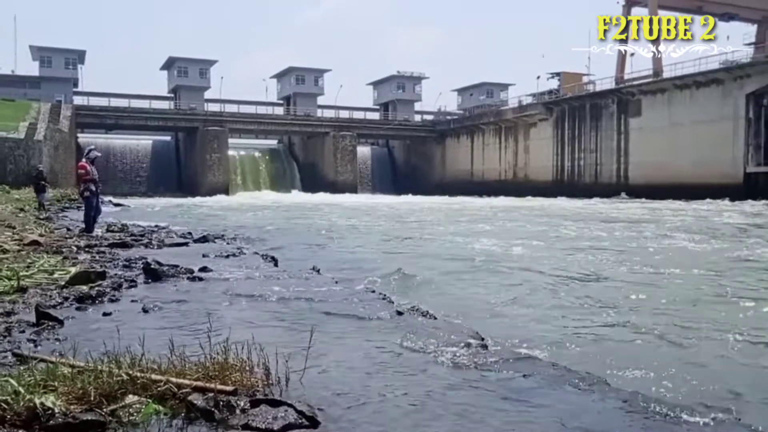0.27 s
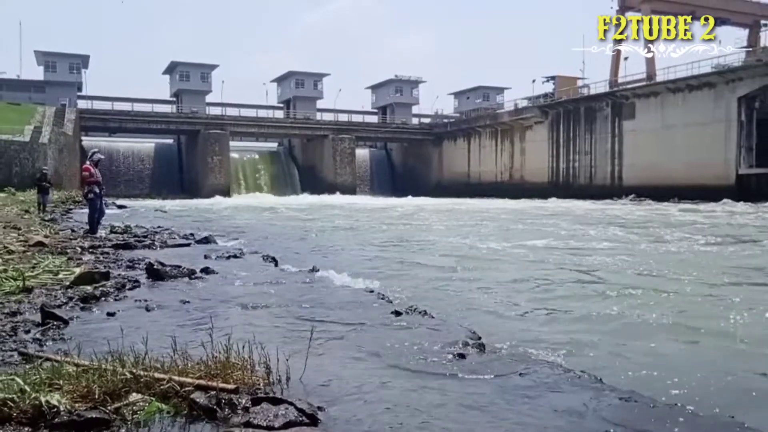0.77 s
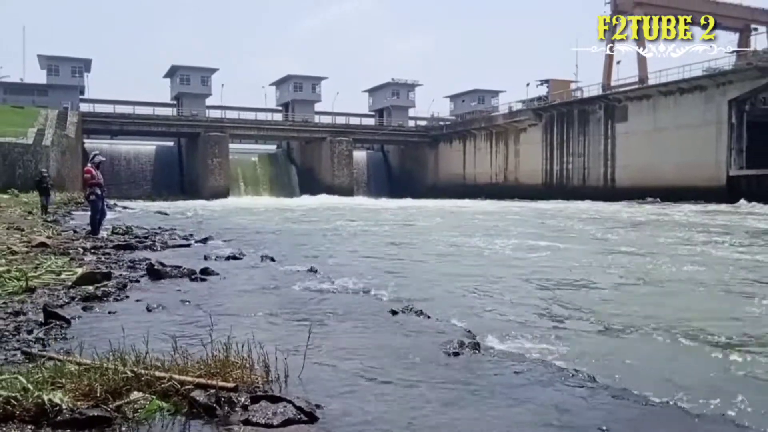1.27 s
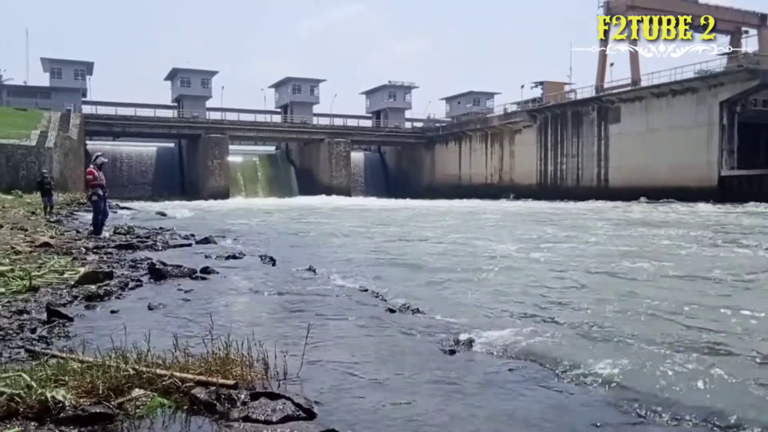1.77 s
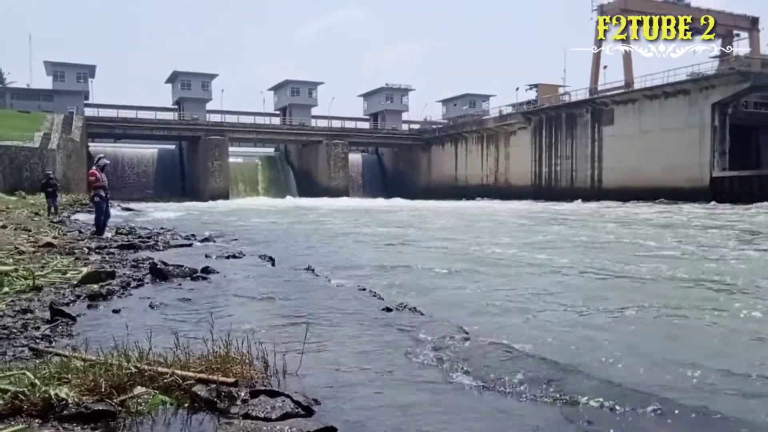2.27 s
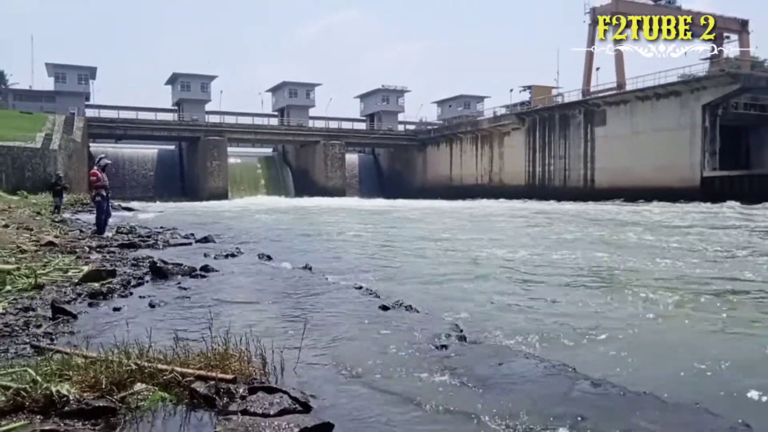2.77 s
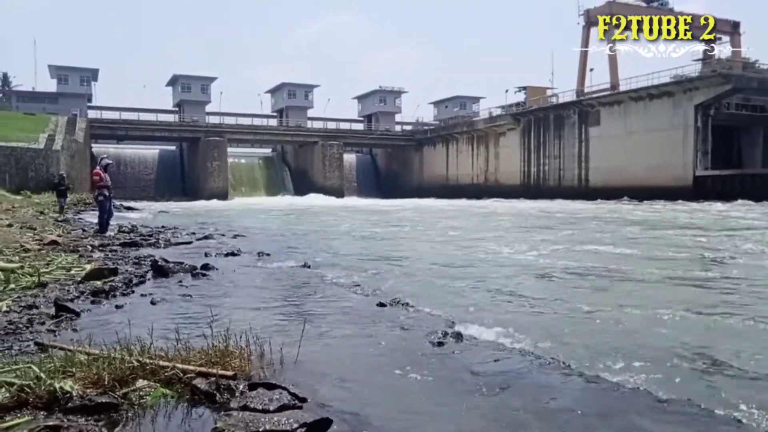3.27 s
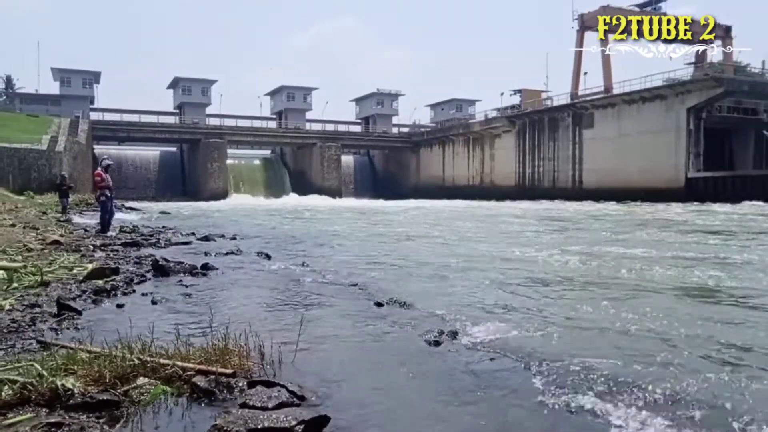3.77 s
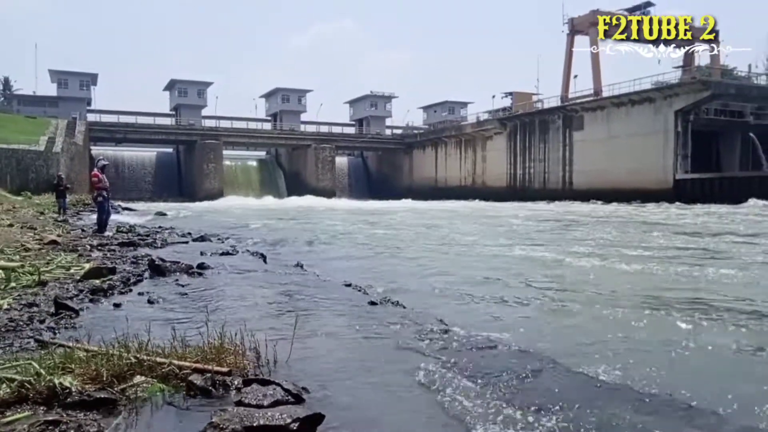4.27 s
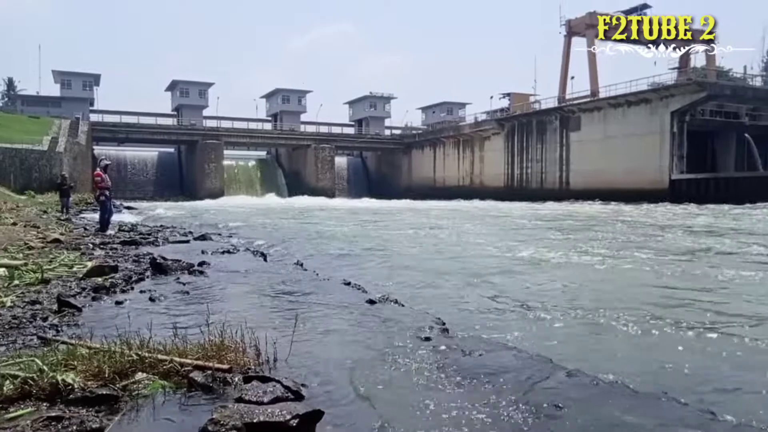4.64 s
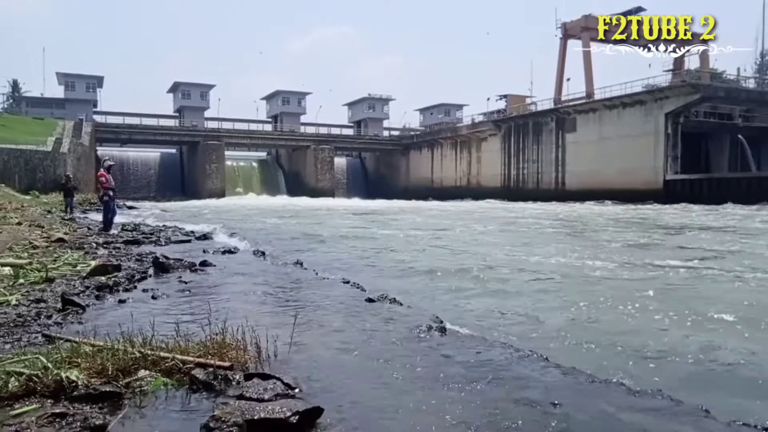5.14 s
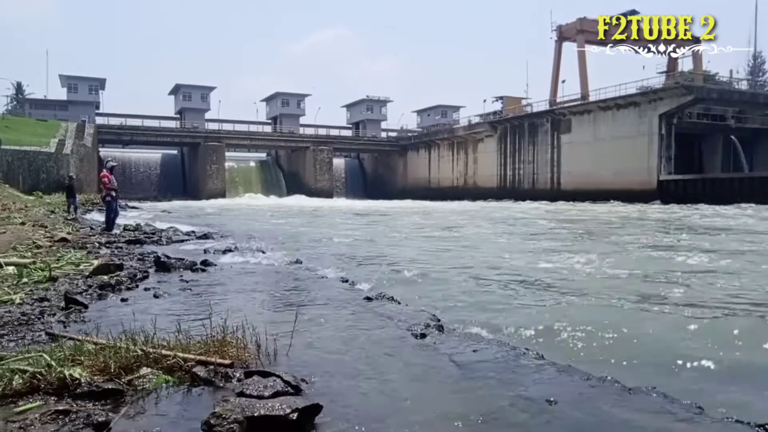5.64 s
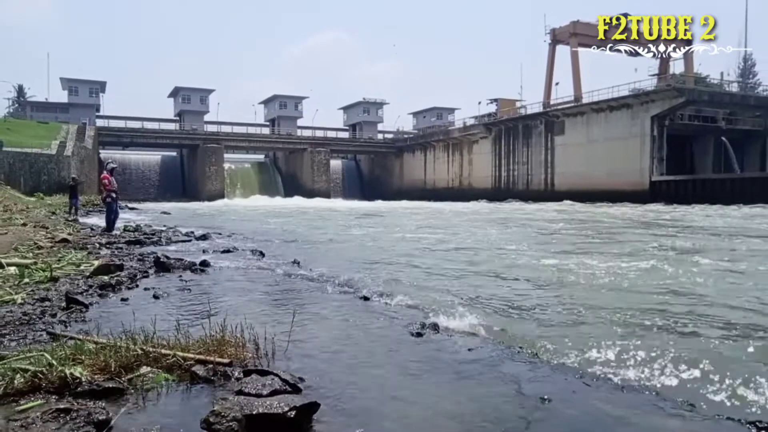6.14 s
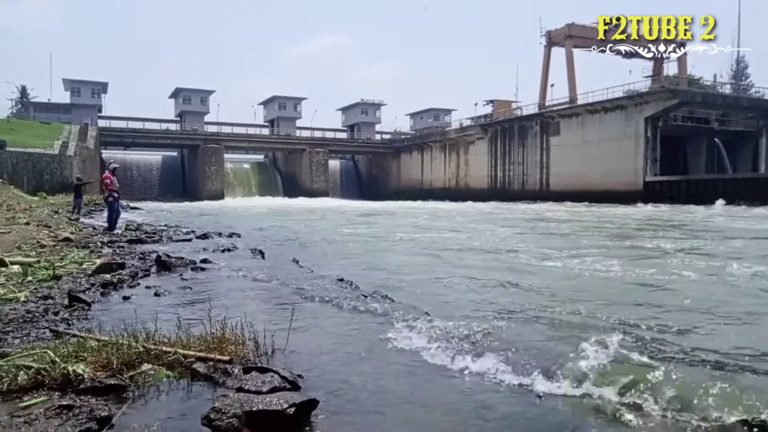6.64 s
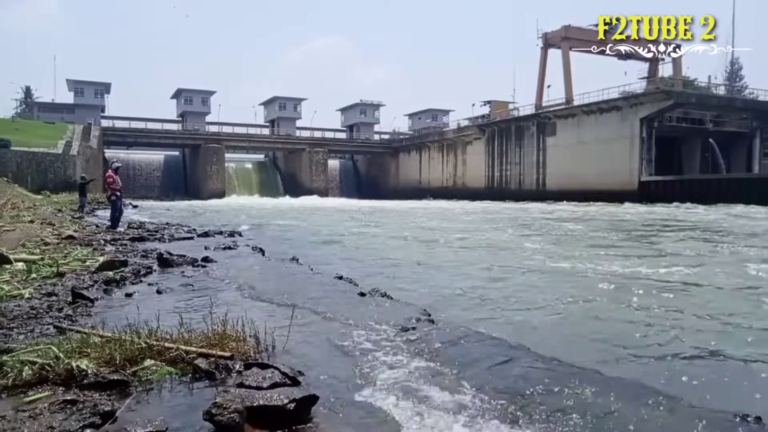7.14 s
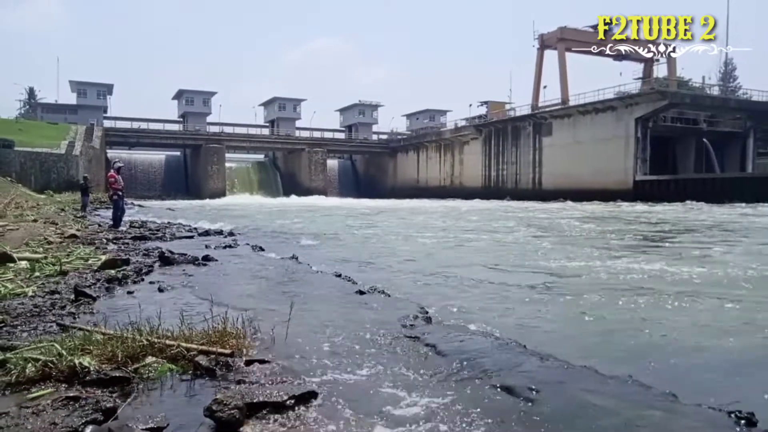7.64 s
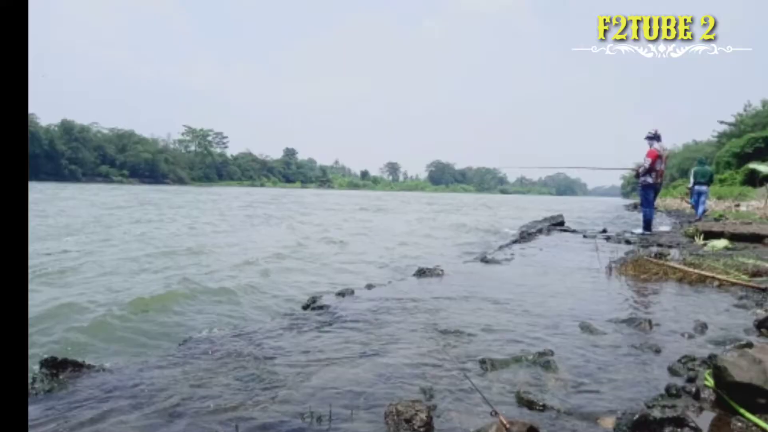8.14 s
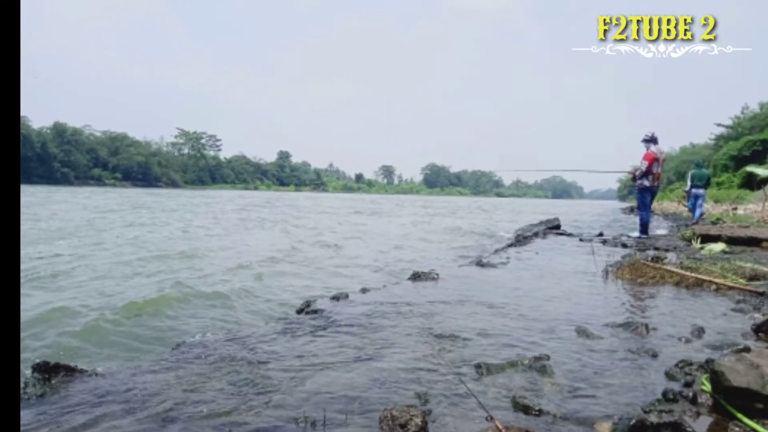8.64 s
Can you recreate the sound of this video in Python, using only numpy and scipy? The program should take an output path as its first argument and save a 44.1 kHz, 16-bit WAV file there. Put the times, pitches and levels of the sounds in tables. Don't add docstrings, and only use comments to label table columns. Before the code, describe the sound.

Outdoors on a rocky riverbank, a distant weir roars low and steady throughout. Close to the microphone, small waves lap and gurgle over stones, swelling into sharp slaps, plops and spitting spray near three and a half seconds and again around seven. Calmer bubbling lies between; the sound stops abruptly at eight seconds.

```python
import sys
import numpy as np
from scipy import signal
from scipy.fft import rfft, irfft, next_fast_len
from scipy.io import wavfile
from scipy.ndimage import uniform_filter1d

SR = 44100
rng = np.random.default_rng(int(sys.argv[2]) if len(sys.argv) > 2 else 0)


def wav_out(sig):
    wavfile.write(sys.argv[1], SR, np.round(np.clip(np.atleast_2d(sig).T, -1, 1) * 32767).astype(np.int16))


def gain_from_db(level_db):
    decades = np.asarray(level_db, float) / 20
    return 10 ** decades


N = 392913
CUT_S, CALM_DB = 8.0147, -39.5

# time in seconds, force in dB, depth (extra low gurgle) in dB, spray (extra fine
# mist) in dB.
WAVES = [(0.0, -40.5, 2, -0.5), (1.3, -43, 3, 0.5), (1.62, -37.5, 9, 4.5), (2.05, -41, 6.5, 2.5),
         (2.3, -38, 4, 0.5), (3.15, -36, 5, -1), (3.5, -32.5, 5.5, 2), (3.8, -29, 5, 0.5),
         (4.25, -37, 5.5, 1.5), (4.8, -38, 1.5, -2), (5.42, -38, 7.5, -2.5), (6.1, -37, -2, -3),
         (6.28, -37, 1, 2), (6.44, -40, 6, 1), (6.6, -37, 5, 2.5), (7.03, -29.5, 3.5, 1),
         (7.45, -35.5, 3.5, 2.5), (8.0, -39.5, 6, 1)]
# lowest pitch in Hz, highest pitch in Hz, ring in cycles,
# rate in bubbles per second, size spread in dB, trim in dB.
SWARMS = [
    (296.3, 850, 5.3, 2000, 2, -6),
    (884, 2220, 5.6, 3000, 2.5, -6),
    (2190, 4600, 5.96, 5000, 3, -2.5),
    (4666, 8800, 7., 5500, 2, -2),
    (9320, 15800, 7., 8000, 0.5, -0.5),
]
# start in seconds, peak in dB, pitch of the peak in the top treble in Hz,
# mid treble against the top in dB.
SPITS = [(1.3119, -33.5, 10500, 1.5), (1.4321, -31, 9400, 9), (1.6297, -29.5, 9280, -5),
         (1.7474, -27, 12600, -0.5), (1.8088, -34, 15200, 4), (2.3306, -31, 9270, -7),
         (3.4705, -22, 14500, -1), (3.4979, -35, 11700, 5.5), (3.5768, -24, 13300, -8),
         (3.6586, -33.5, 13800, 3), (3.7219, -26, 14600, 4.5), (3.7688, -25, 13400, 3),
         (4.0297, -33, 15100, -4), (4.1435, -24.5, 11500, 0.5), (4.3151, -22, 11000, -6),
         (4.3505, -23, 14300, -3), (4.7411, -30, 12300, -2), (4.8264, -33, 9870, -4),
         (6.2567, -28, 13800, -1), (6.3435, -30, 9420, -8), (6.5076, -22.5, 13900, -6),
         (6.5475, -24, 9180, -20), (6.7555, -30, 12100, -19), (6.9012, -27.5, 10300, 0.5),
         (6.9561, -26, 13900, -6), (6.996, -27, 13200, -3), (7.199, -26.5, 9130, 3.5),
         (7.2549, -29, 14000, 5), (7.3687, -27, 15300, -11), (7.5343, -29.5, 9850, 4)]
# frequency in Hz, gain in dB.
PORT = [(2500, -0.5), (3300, 1.5), (3800, -0.5), (4300, -6.5), (5200, -8.5), (6200, -5.5), (7280, -0.5),
        (8300, -8), (9900, -17.5), (13000, -20), (14500, -25), (16000, -26.5)]


def evened(x):
    return x / np.sqrt(np.mean(x ** 2) + 1e-20)


def coloured(x, *spectra):
    size = next_fast_len(len(x))
    log_hz = np.log(np.fft.rfftfreq(size, 1 / SR) + 1)
    gain_db = 0
    for spectrum in spectra:
        hz, db = np.transpose(spectrum)
        gain_db = gain_db + np.interp(log_hz, np.log(hz), db)
    return irfft(rfft(x, size) * gain_from_db(gain_db), size)[:len(x)]


def curve(rows, index):
    rows = np.array(rows)
    return np.interp(np.arange(N) / SR, rows[:, 0], rows[:, index])


def add(mix, start_s, sound):
    part = mix[round(start_s * SR):][:len(sound)]
    part += sound[:len(part)]


def bubble(hz, cycles, glide, snap=7):
    u = np.arange(int(4 * SR * cycles / hz) + 8) * hz / SR / cycles
    envelope = (1 - np.exp(-snap * u)) * np.exp(-2.5 * u)
    return envelope * np.sin(2 * np.pi * cycles * (u + glide * u ** 2))


def waves():
    out = np.zeros(N)
    for power, (*bubbles, trim_db) in zip(stirring(), SWARMS):
        out += np.sqrt(power) * swarm(*bubbles)
    return out


def stirring():
    # level in calm water in dB, share of force,
    # share of depth, share of spray, churn in dB.
    answers = [
        (-41, 0.83, 1.22, 0, 0.44),
        (-39, 0.88, 0.79, 0, 0.87),
        (-40.5, 1, 0.066, 0.28, 0.9),
        (-46, 0.82, 0, 0.78, 1.46),
        (-57, 1, 0.18, 1.1, 2.3),
    ]
    # start in seconds, patter peak in dB, gurgle against patter in dB,
    # fizz against patter in dB.
    slaps = [(1.305, -31.5, 0, 6), (1.477, -28, 4, -12), (1.585, -22, 3, -7), (1.7464, -24, -2, -3),
             (1.885, -30, -6, 4), (3.31, -24, 4, -7), (3.47, -15, -10, -8.5), (3.5409, -20, 3, -2),
             (3.59, -13, -3, -19), (3.64, -23.5, -1, -10.5), (3.69, -15.5, -10, -4),
             (3.735, -20.5, 0.5, -4), (3.7673, -11.5, -2.5, -4.5), (3.87, -39.5, 0.5, -3),
             (4.0093, -18, -1, -14), (4.11, -25, -2, 2), (4.33, -20, 3, -2), (5.075, -23, 4, -7),
             (5.3954, -25, 4, -1), (6.2302, -20.5, -8, -11), (6.309, -25, 4, 2.5), (6.5086, -12.5, -5, -8),
             (6.565, -16, 0.5, -7), (6.725, -19.5, 2, -9), (6.9012, -15, -6, -6), (6.9386, -13, -8, -4.5),
             (6.997, -15.5, -14, -3.5), (7.055, -21.5, 0, 0), (7.2025, -15, -3, -6), (7.3684, -23, -10, 0)]
    churn_s, slap_ms = 0.025, 13
    deep_under_gurgle_db, spray_under_fizz_db = 8, 9

    force_db = curve(WAVES, index=1) - CALM_DB
    depth_db = curve(WAVES, index=2)
    spray_db = curve(WAVES, index=3)
    span = int(churn_s * SR)
    powers = []
    for (calm_db, force, depth, spray, churn_db), (*_, trim_db) in zip(answers, SWARMS):
        churn = uniform_filter1d(rng.standard_normal(N), span)
        churn = evened(uniform_filter1d(churn, span))
        wave_db = calm_db + force * force_db + depth * depth_db + spray * spray_db
        powers.append(gain_from_db(2 * (wave_db + churn_db * churn + trim_db)))

    t = np.arange(4000) / SR
    burst = t / (t + 0.00057) * np.exp(-2000 * t / slap_ms)
    for start_s, patter_db, gurgle_db, fizz_db in slaps:
        parts_db = (gurgle_db - deep_under_gurgle_db, gurgle_db, 0, fizz_db, fizz_db - spray_under_fizz_db)
        for power, part_db in zip(powers, parts_db):
            add(power, start_s, gain_from_db(2 * (patter_db + part_db - 10)) * burst)
    return powers


def swarm(low_hz, high_hz, cycles, rate, spread_db):
    # frequency in Hz, level in dB per Hz.
    splash = [(150, -41.5), (350, 6), (800, 3.5), (1630, 3), (2500, -5), (8000, -3), (12500, -5.5),
              (14500, 5)]
    draw, sort = rng.random((2, N))
    clumps = evened(uniform_filter1d(rng.standard_normal(N), size=300))
    size_db = spread_db * np.minimum(rng.exponential(1, N), 4.2) + 0.97 * clumps
    size = gain_from_db(size_db) * (draw < rate / SR)
    pitches_hz = np.geomspace(low_hz, high_hz, num=10)
    pitch_index = (sort * len(pitches_hz)).astype(int)
    out = np.zeros(N)
    for k, hz in enumerate(pitches_hz):
        grain = bubble(hz, cycles, glide=0.08)
        grain = grain * np.sqrt(hz) / np.linalg.norm(grain)
        out += signal.oaconvolve(size * (pitch_index == k), grain)[:N]
    return evened(coloured(out, splash, PORT))


def plops():
    # start in seconds, peak in dB, pitch in Hz.
    snaps = [(1.597, -14.5, 1500), (1.94, -17, 869), (3.47, -16.5, 1060), (3.54, -10, 3600),
             (3.576, -13, 845), (3.594, -19.5, 937), (3.601, -15, 2100), (3.737, -12.5, 1400),
             (3.767, -5, 1630), (3.769, -8.5, 1070), (3.784, -15, 3090), (5.082, -18, 937),
             (5.841, -20, 1380), (6.23, -17, 3170), (6.307, -12, 3340), (6.509, -13, 1880),
             (6.508, -14.5, 3200), (6.529, -19, 3500), (6.564, -19, 1310), (6.568, -15, 990),
             (6.622, -19, 1460), (6.901, -14, 3950), (6.914, -16, 3200), (6.9393, -7.5, 1770),
             (6.995, -17, 3940), (7.165, -10, 3680), (7.201, -12.5, 2590), (7.045, -18, 1100),
             (7.933, -14.5, 3600)]
    # start in seconds, peak in dB, pitch in Hz, ring in ms.
    gulps = [(1.478, -15.5, 670, 12), (1.74, -14.5, 571, 7.4), (3.393, -16, 440, 13), (3.455, -17, 680, 14),
             (3.498, -17, 565, 11), (3.545, -24.5, 425, 9), (3.868, -13, 398, 28), (5.36, -18, 415, 10),
             (5.38, -17, 500, 12), (5.404, -10.5, 590, 8.3), (5.414, -19, 675, 10), (5.453, -20, 519, 9),
             (6.499, -11, 610, 8.4), (6.551, -11, 540, 9)]
    plop_ms = 3.2
    out = np.zeros(N)
    for start_s, db, hz in snaps:
        plop = bubble(hz, hz * plop_ms / 1000, glide=0.023, snap=22)
        add(out, start_s + 0.001, 0.94 * gain_from_db(db) * plop)
    for start_s, db, hz, ring_ms in gulps:
        gulp = bubble(hz, hz * ring_ms / 1000, glide=0.03)
        add(out, start_s + 0.00082, 0.92 * gain_from_db(db) * gulp)
    return out


def spits():
    decay_ms = 0.9
    t = np.arange(600) / SR
    envelope = t / (t + 0.00012) * np.exp(-1000 * t / decay_ms)
    rows = SPITS + scattered() + strays()
    noises = rng.standard_normal((len(rows), len(t)))
    out = np.zeros(N)
    for (start_s, db, hz, mid_db), noise in zip(rows, noises):
        mid = [(3000, mid_db - 24.0), (5200, mid_db - 4), (7300, mid_db + 17.0), (9000, 0.0015)]
        top = [(0.9 * hz, -4.0), (hz, 2.5), (1.4 * hz, -4.0)]
        add(out, start_s, 1.75 * gain_from_db(db) * coloured(noise, mid, top) * envelope)
    return out


def scattered(count=3):
    scatter_s, scatter_db = 0.05, -9
    draws = rng.random((len(SPITS), count, 4))
    rows = []
    for (start_s, db, _, _), drops in zip(SPITS, draws):
        for late, weak, pitch, mid in drops:
            land_s = start_s + 0.004 + scatter_s * late ** 1.5
            drop_db = db + scatter_db - 6 * weak
            rows.append((land_s, drop_db, 8500 + 7000 * pitch, 14 * mid - 7))
    return rows


def strays(count=80):
    stray_db, spread_db, force_share = -40.5, 5.5, 0.47
    when, size, pitch, mid = rng.random((count, 4)).T
    force_db = curve(WAVES, index=1)[:int(CUT_S * SR)] - CALM_DB
    crowd = np.cumsum(gain_from_db(1.2 * force_db))
    at = np.searchsorted(crowd / crowd[-1], when)
    db = stray_db + force_share * force_db[at] + spread_db * size
    return list(zip(at / SR, db, 9000 + 6000 * pitch ** 2, 10 * mid - 5))


def roar():
    # frequency in Hz, level in dB per Hz.
    fall = [(15, -60), (25, -45.5), (45, -16.5), (65, -7), (105, 1), (150, -0.5), (240, -4.5), (310, -8.5),
            (365, -15), (430, -10), (620, -13.5), (1460, -22.5), (2500, -24), (16000, -27.5)]
    # time in seconds, rumble level in dB.
    swell = [(0.0, -30.5), (1.2, -29.5), (2.3, -30), (3.3, -29.5), (4.4, -30), (5.4, -29), (6.15, -29.5),
             (6.6, -29), (8.0, -30)]
    level_db = -26.5 - 0.73
    frames = N // 256 + 5
    re, im, patches = rng.standard_normal((frames, 513, 3)).T
    patches = uniform_filter1d(patches, size=14, axis=0)
    patches = evened(uniform_filter1d(patches, size=16, axis=1))
    spectrogram = (re + 1j * im) * gain_from_db(0.84 * patches)
    noise = signal.istft(spectrogram, nperseg=1024, noverlap=768)[1][:N]
    swell_db = curve(swell, index=1)
    gain = gain_from_db(level_db + swell_db - np.median(swell_db))
    return gain * evened(coloured(noise, fall, PORT))


def scene():
    return (waves() + plops() + spits() + roar())[None]


def band_limit(x):
    return signal.sosfilt(signal.butter(12, 16160, fs=SR, output="sos"), x)


def record(dry):
    edge = signal.firwin(numtaps=1023, cutoff=15480, window="blackman", fs=SR)
    narrow = signal.oaconvolve(dry, edge[None], "same")
    running = np.arange(N) < CUT_S * SR
    return band_limit(narrow * running)


dry = scene()
out = record(dry)
wav_out(out)
```